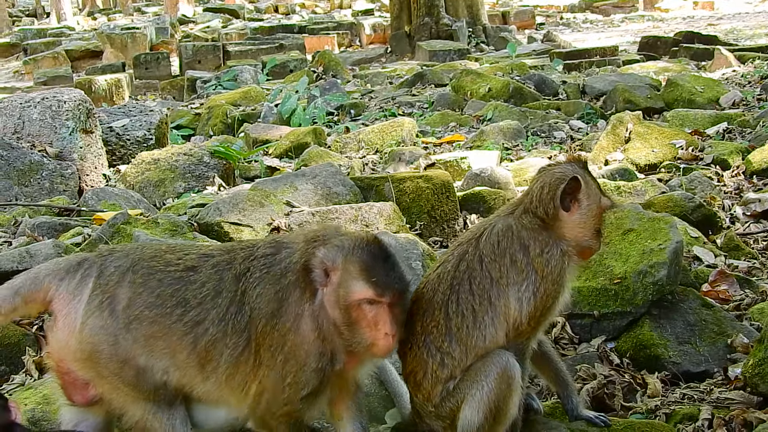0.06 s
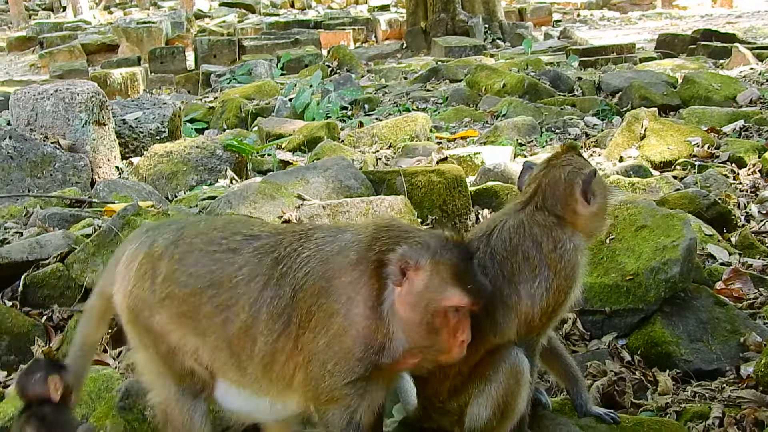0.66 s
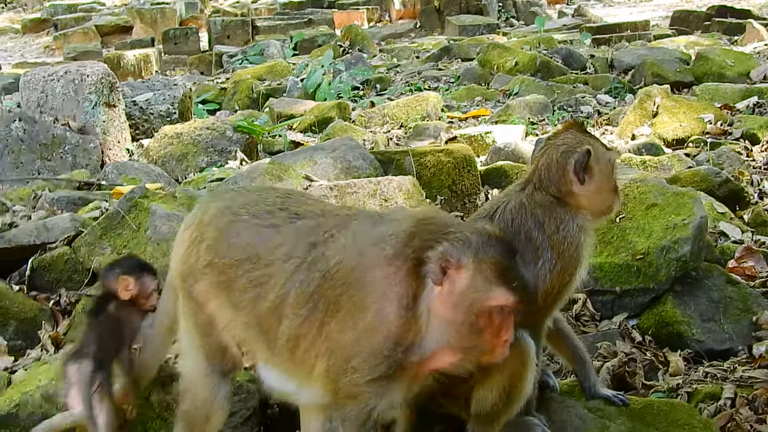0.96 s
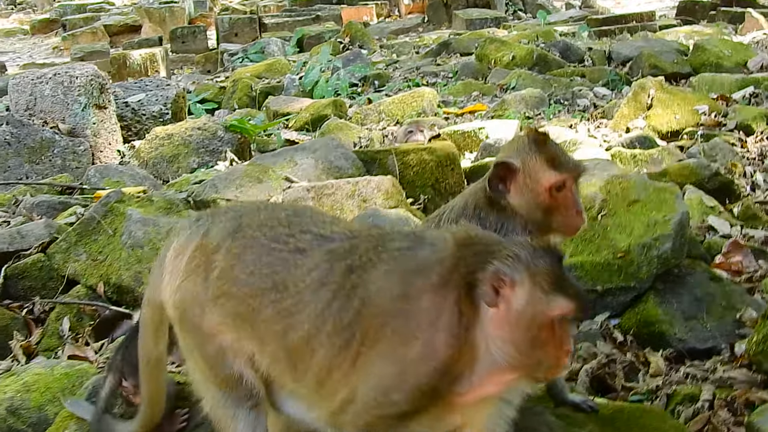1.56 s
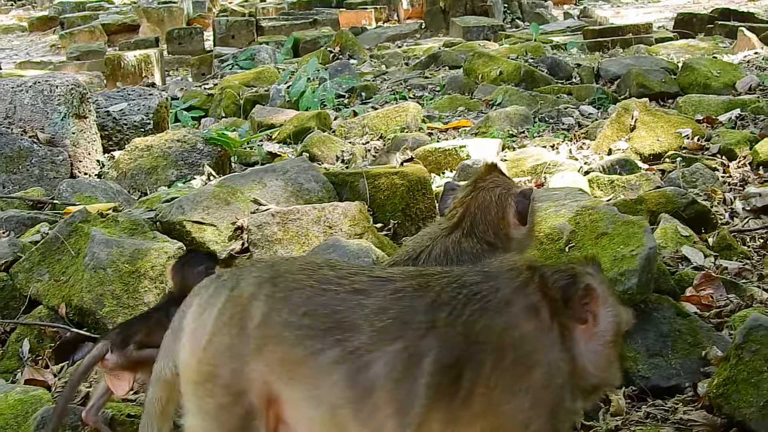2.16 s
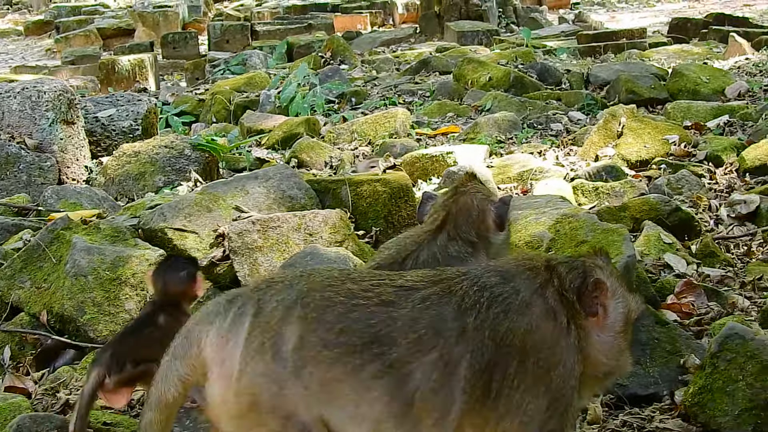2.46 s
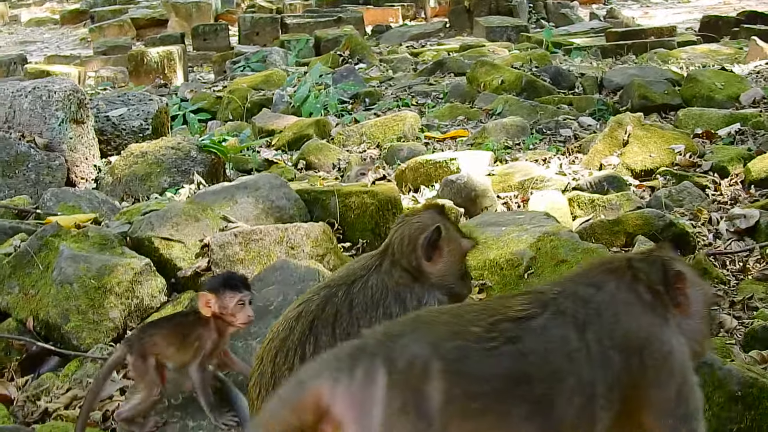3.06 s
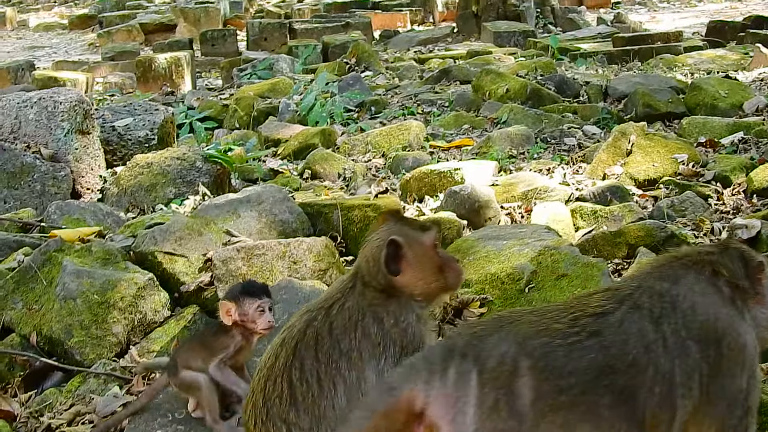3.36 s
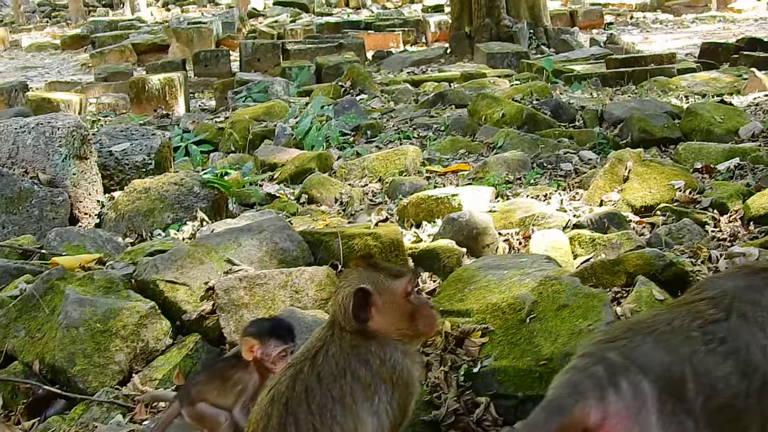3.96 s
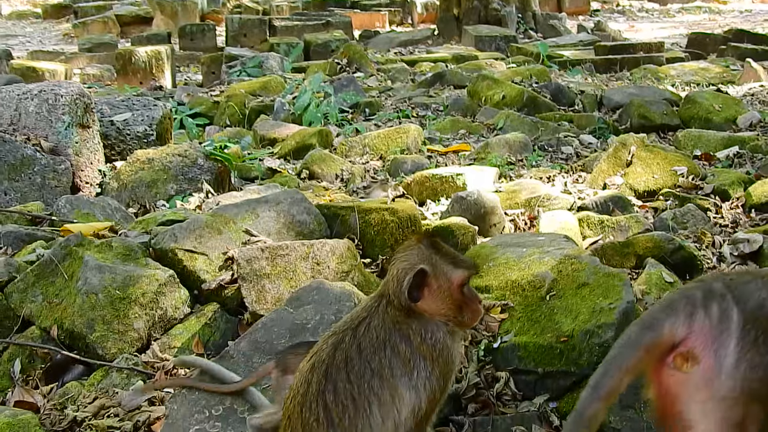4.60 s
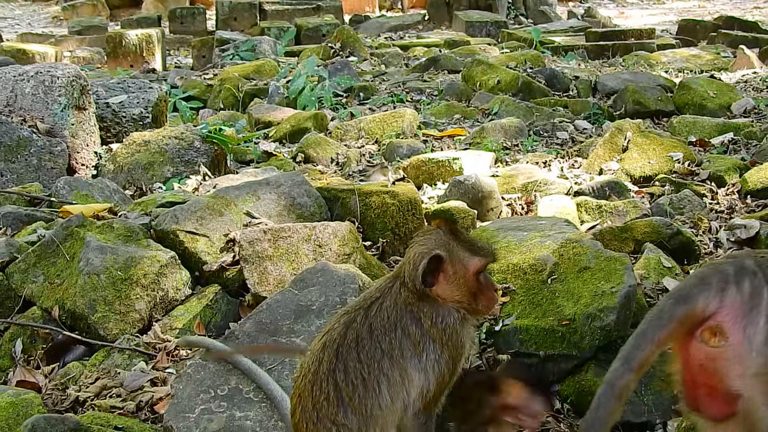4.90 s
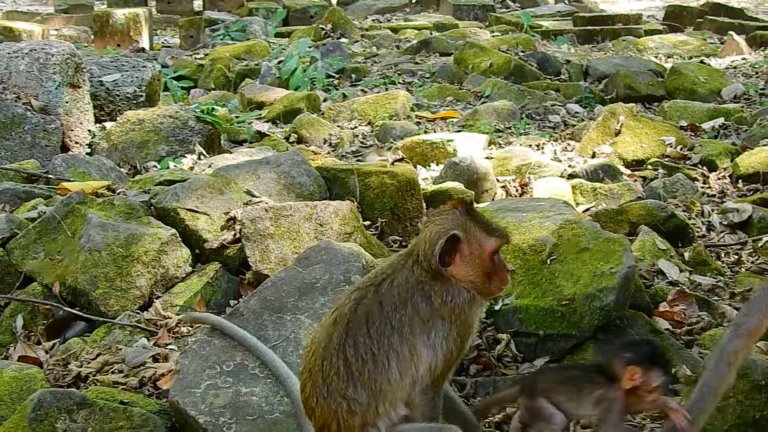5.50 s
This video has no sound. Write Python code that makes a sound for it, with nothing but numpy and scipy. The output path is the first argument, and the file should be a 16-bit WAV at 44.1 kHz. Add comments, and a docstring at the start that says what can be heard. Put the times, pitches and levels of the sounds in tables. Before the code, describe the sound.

A young monkey squeals outdoors among stones, over a faint rumble of air. Each squeal is a very short, thin, high whistle that turns raspy and falls in pitch, several ending on a brief, lower, hoarse note. Six come in quick succession between 0.2 and 1.9 seconds, followed by toneless rasps and one dull, close knock at about 2 seconds. Further squeals come at about 2.4, 2.8 and 3.3 seconds, with a last, weaker one at 4.1. Throughout, dry leaves crunch and rustle as other monkeys walk through them, with a few soft footfalls and stronger crunches near 1.1 and 2.7 seconds. Twigs snap here and there from the start, sounding brighter after 3 seconds and coming thickest from 4.2 to the end at 5.5, sharpest around 5 seconds. The squeals and snaps carry a short, thin echo.

```python
"""A young macaque squeals again and again among mossy stones in a wood while other monkeys cross dry leaves.
Its vocal folds give a thin whistle that turns to a rasp as their cycles grow irregular, then falls in
pitch; a short, low, hoarse note is heard at the end of several squeals. Many tiny fractures make the
leaves crunch and rustle, twigs snap and ring, soles thud softly, and one dull knock sounds close by.
Stones and trunks scatter an echo of the voice and the twigs, and the air rumbles faintly."""
import sys
import numpy as np
from scipy import signal
from scipy.fft import rfft, irfft, next_fast_len
from scipy.io import wavfile

SR = 44100
rng = np.random.default_rng(int(sys.argv[2]) if len(sys.argv) > 2 else 0)


def persist_wave(psi):
    """Save psi, clipped to +-1, as 16-bit WAV."""
    counts = np.round(np.clip(psi, -1, 1) * 32767).astype(np.int16)
    wavfile.write(sys.argv[1], SR, np.atleast_2d(counts).T)


N = 244314
TIME = np.arange(N) / SR

# Spectrum of the air's rumble: frequency_hz, gain_db
AIR_SPECTRUM = [(15, -41), (25, -14), (56, 0), (86, 2), (117, -1), (249, -14), (372, -18.5), (554, -17),
                (600, -12), (780, -58), (1320, -120)]
# Likeness of left and right: frequency_hz, correlation
COHERENCE = [(60, 0.98), (500, 0.91), (1300, 0.94), (2600, 0.82), (5500, 0.65), (10000, 0.46)]
# Steady stirring of the dry leaves: time_s, crunch_db, rustle_db
LEAF_STIRRING = [(0, -49, -41), (.28, -48, -41), (.48, -46, -36), (.72, -43.5, -30.5), (1.05, -44.5, -33),
                 (1.25, -33.5, -29.5), (1.35, -35, -31), (1.52, -32.5, -33.5), (1.64, -38.5, -33.5),
                 (1.78, -33.5, -36), (1.98, -32.5, -31), (2.08, -42, -35), (2.3, -45, -36.5),
                 (2.6, -48, -38), (3.52, -44.5, -36), (3.8, -43, -25), (4.03, -44.5, -32), (4.27, -47, -32),
                 (4.6, -47, -37.5), (5.2, -48.5, -36.5), (5.54, -47.5, -35.5)]
# A foot or flank pushes through the leaves: start_s, length_s, crunch_db, rustle_db
LEAF_PUSHES = [(0.316, .12, -32.5, -28), (0.6, 0.088, -45, -26), (.745, 0.058, -41, -25.5),
               (.895, 0.06, -49, -27), (1.116, .15, -24.5, -21.5), (1.587, 0.034, -41, -27),
               (1.982, 0.043, -36, -25), (2.434, 0.092, -40.5, -28.5), (2.568, 0.027, -48, -33),
               (2.651, 0.04, -34, -26.5), (2.671, 0.059, -26, -19), (2.716, 0.18, -43.5, -33.5),
               (3.058, 0.079, -44.5, -28.5), (3.182, 0.06, -51, -32), (3.566, 0.17, -41, -31),
               (3.681, 0.038, -52, -25), (3.793, 0.11, -36, -31), (4.157, 0.11, -44, -28.5),
               (4.378, 0.18, -51, -36.5), (4.635, 0.069, -43.5, -27), (4.737, 0.04, -41, -29),
               (4.821, 0.037, -42, -30), (4.862, 0.073, -38, -24.5), (4.967, 0.031, -42, -26.5),
               (5.06, 0.033, -33, -21.5), (5.367, .065, -42, -30), (5.478, 0.063, -36, -29)]
# Spectrum of the crunch as heard: frequency_hz, gain_db
CRUNCH_SPECTRUM = [(150, -7.5), (330, -11), (600, -2.5), (1200, 0), (2200, 0), (3200, -2), (4500, -12.5),
                   (7000, -31)]
# Spectrum of the rustle as heard, brightest near 6.5 kHz: frequency_hz, gain_db
RUSTLE_SPECTRUM = [(2000, -26.5), (3200, -9.5), (4400, -4), (5500, -1.5), (6600, 0.5), (7600, -4.5),
                   (9000, -15), (11000, -25), (15500, -43)]
# Soft footfalls and scuffs: start_s, length_s, centre_hz, level_db
FOOTFALLS = [(0.083, 0.073, 210, -40.5), (0.336, 0.039, 430, -45), (0.397, 0.017, 630, -37),
             (0.899, 0.028, 199, -40.5), (1.14, 0.079, 655, -39.5), (2.66, 0.039, 614, -37),
             (2.684, 0.023, 350, -33), (3.58, .15, 230, -50)]
# Twig and leaf stalk snaps: start_s, low_peak_db, low_hz, treble_peak_db, treble_hz, relative_ring_db
TWIG_SNAPS = [(0.122, -21, 1100, -36, 5500, -10), (0.326, -18, 3020, -26, 5500, -5),
              (0.4039, -15.5, 2320, -15, 6500, -9), (1.0937, -15.5, 1900, -32, 5500, -8),
              (1.132, -10, 1370, -20, 5500, -14), (1.157, -15, 1205, -30, 5500, 4),
              (1.183, -17, 1130, -16, 5500, -1), (1.284, -18, 1350, -22, 5530, -5),
              (1.549, -15.5, 2030, -28, 5450, -6), (1.715, -20, 1900, -23, 5500, 1),
              (1.74, -18, 1380, -21, 5500, -3), (2.109, -30, 2500, -19, 6200, -8),
              (2.2107, -23.5, 1880, -34, 5500, -3), (2.277, -26, 1900, -30, 5550, -6),
              (2.573, -28, 1950, -25, 5500, -5), (2.8625, -26, 3000, -15.5, 5530, -11),
              (3.122, -26, 3770, -25, 5500, -12), (3.181, -34, 3380, -5.5, 5330, -3),
              (3.546, -25.5, 3410, -28, 5500, -2), (3.575, -17.5, 1830, -18, 5500, -15),
              (3.6906, -22, 3420, -7.5, 5540, -9), (4.2197, -30, 3370, -15.5, 5010, -9),
              (4.3683, -40, 3380, -16, 6800, -1.5), (4.38, -27, 3400, -15, 4760, -7),
              (4.414, -23, 3310, -10, 6600, -8), (4.457, -30, 3370, -19, 5320, -12),
              (4.654, -23, 3360, -8.5, 6520, -9), (4.659, -23, 3720, -9, 4760, -4),
              (4.6723, -41, 3430, -11.5, 6780, 9), (4.76, -30, 3420, -19, 6230, -6),
              (4.8325, -24.5, 3430, -12.5, 6800, -7), (4.8753, -16, 3670, -9, 6200, -14),
              (4.9265, -16, 3250, -7.5, 6600, -3), (4.961, -14, 3480, 0, 6520, -10),
              (5.0679, -14, 3500, -1, 6080, -12), (5.072, -15, 3500, -11, 6100, -3),
              (5.2816, -20.5, 3360, -13.5, 5080, -4.5), (5.3861, -17.5, 3000, -13, 5330, -13),
              (5.493, -21, 3530, -23, 5200, 2)]
# Squeals that climb to a crest and fall, roughness from 0 to 1: start_s, climb_s, fall_s, first_hz,
# crest_hz, last_hz, first_db, crest_db, first_roughness, crest_roughness, upper_harmonics_db,
# first_left_minus_right_db
SQUEAL_ARCHES = [(.162, 0.089, 0.06, 1857, 2106, 1642, -34.5, -17.5, 0.07, 0.25, 1.5, 1),
                 (.498, .06, .1, 2123, 2194, 1900, -18.5, -15.5, 0.01, 0.4, -0.5, -1.5),
                 (.908, 0.019, 0.032, 1433, 1460, 1400, -31, -28.5, 0.43, 0.47, -9, -1),
                 (1.137, 0.074, 0.04, 2012, 2180, 1860, -22.5, -16, 0.2, 0.26, -8, -.5),
                 (1.39, 0.05, 0.09, 1992, 2220, 1825, -18, -15, 0.25, 0.55, -1.5, -0.5),
                 (1.706, .076, .08, 2012, 2230, 1770, -23, -20, 0.15, .22, 2, -1.5),
                 (2.345, .074, 0.074, 1827, 2080, 1352, -43, -19, .16, .17, 2.5, -1),
                 (2.8065, .004, .048, 1880, 1868, 1760, -15, -19, .12, 0.28, -8, -1),
                 (3.318, 0.037, .092, 2126, 2159, 1835, -25, -17, 0.04, 0.05, -13, -6),
                 (4.097, 0.0088, 0.075, 2173, 2150, 1666, -38, -25, 0.26, .17, -11, -1)]
# The voice falters, then comes back at once and higher: return_s, depth_db, pitch_jump_hz
VOICE_CATCHES = [(0.205, -0.5, 119), (.259, 7, 30), (.547, 19, 70), (1.188, 11, 120), (1.788, 12, 50),
                 (2.421, 7, 40), (3.359, 6, 30)]
# Spectrum of the voice as heard: frequency_hz, gain_db
VOICE_SPECTRUM = [(1400, -32.5), (2100, -21), (3000, -13.5), (4200, -18.5), (5200, -5), (6000, 1.5),
                  (6600, 1.5), (7500, -14), (8600, -19.5), (10300, -18), (12500, -26.5), (15500, -38.5)]
# Short, low, hoarse falling notes at the ends of squeals: start_s, length_s, first_hz, last_hz, level_db
LOW_NOTES = [(0.302, 0.016, 1700, 1350, -36), (0.659, 0.027, 2030, 1730, -35.5),
             (1.491, 0.043, 2110, 1900, -29.5), (2.024, 0.07, 2466, 2450, -33.5),
             (2.478, 0.032, 2113, 1300, -36.5), (3.407, 0.031, 2250, 1790, -36.5),
             (3.443, 0.019, 1570, 1430, -39), (4.174, 0.024, 1574, 1373, -30.5)]
# Toneless rasps between squeals: start_s, length_s, level_db
BREATH_RASPS = [(1.827, 0.11, -25), (1.932, 0.033, -23.5), (1.998, .088, -28), (3.081, 0.016, -35)]
# Spectrum of the rasps as heard: frequency_hz, gain_db
RASP_SPECTRUM = [(1800, -22), (2800, -12), (4600, -2.5), (6500, 2), (7900, -5), (9700, 0), (11200, -14.5),
                 (13000, -23), (15500, -32)]
# Modes of the dull knock: frequency_hz, relative_level_db, t60_s
KNOCK_RESONANCES = [(750, -0.5, 0.013), (1100, -6.5, .014), (1900, -10, 0.0095)]
# Level difference of the two microphone ports: frequency_hz, left_minus_right_db
PORT_BALANCE = [(60, 1.2), (300, 2), (1300, 0.3), (3000, 1), (6000, -0.5), (10000, 1)]
# Phase difference of the ports, negative where the left lags: frequency_hz, left_lead_rad
PORT_LEAD = [(0, 0), (3530, -0.25), (5170, -0.76), (6630, -0.75), (13100, -1.04), (15800, -0.0)]

ATTACK_S, RELEASE_S = 0.0026, 0.0095
TREBLE_LAG_S = 0.013   # the treble of a crack or rustle is heard this long after its low part
HALF_EACH_SIDE = np.array([[.5], [-.5]])   # shares a left-minus-right difference between the channels


def from_db(db):
    """Amplitude ratio: tenfold for every 20 dB."""
    return 10 ** (np.asarray(db) / 20)


def unit_rms(x):
    """Normalisation to unit mean power."""
    return x / np.sqrt(np.mean(x ** 2) + 1e-20)


def at_hz(points, hz):
    """Interpolation of a spectrum on a log-frequency axis."""
    f, value = np.transpose(points)
    return np.interp(np.log(np.maximum(hz, 1)), np.log(f), value)


def wander(rate_hz, size):
    """Random modulation: low-passed noise of unit rms."""
    f = np.fft.rfftfreq(size, 1 / SR)
    return unit_rms(irfft(rfft(rng.standard_normal(size)) / (1 + (f / rate_hz) ** 4), size))


def band(x, low_hz, high_hz):
    """Band-pass filtering with gentle slopes."""
    sos = signal.butter(2, [low_hz, min(high_hz, SR * .45)], "band", fs=SR, output="sos")
    return signal.sosfilt(sos, x + 1e-18)


def ring(x, hz, t60_s):
    """Damped resonator: a unit impulse excites a decaying sine of height 1."""
    r, w = from_db(-60 / (t60_s * SR)), 2 * np.pi * hz / SR
    return signal.lfilter([0, np.sin(w)], [1, -2 * r * np.cos(w), r * r], x + 1e-18)


def spread(pair, spectrum):
    """Partial coherence: two unrelated signals become coloured stereo of rms 1, less alike in the treble."""
    size = pair.shape[1]
    padded = next_fast_len(size)
    f = np.fft.rfftfreq(padded, 1 / SR)
    mid, side = rfft(pair, padded) * from_db(at_hz(spectrum, f))
    alike = at_hz(COHERENCE, f)
    stereo = np.sqrt(1 + alike) * mid + np.sqrt(1 - alike) * side * [[1], [-1]]
    return unit_rms(irfft(stereo, padded)[:, :size])


def gate(t, attack_s):
    """Trapezoidal envelope: a quick start and a quick stop."""
    return np.clip(np.minimum(t / attack_s, (t[-1] - t) / RELEASE_S), 0, 1)


def add(out, start_s, sound):
    """Superposition: a sound joins the mix at its start time."""
    i = max(0, round(start_s * SR))
    out[:, i:i + sound.shape[-1]] += sound[..., :N - i]


def air(level_db=-46):
    """Stationary noise with its power in the bass: the rumble of the air."""
    return from_db(level_db) * spread(rng.standard_normal((2, N)), AIR_SPECTRUM)


def stirring(crest_share=0.27, range_db=10):
    """Incoherent sources add in power: each push swells and dies away over the steady stirring of leaves."""
    times_s, *levels_db = np.transpose(LEAF_STIRRING)
    power = from_db([np.interp(TIME, times_s, db) for db in levels_db]) ** 2
    for start_s, length_s, crunch_db, rustle_db in LEAF_PUSHES:
        t = TIME[:int(length_s * SR)]
        swell_db = np.interp(t / length_s, [0, crest_share, 1], [-range_db, 0, -range_db])
        swell = gate(t, ATTACK_S) * from_db(swell_db)
        add(power[:1], start_s, (from_db(crunch_db) * swell) ** 2)
        add(power[1:], start_s + TREBLE_LAG_S, (from_db(rustle_db) * swell) ** 2)
    return np.sqrt(power)


def crackle(spectrum, per_s, unevenness_db, ring_cycles, rubbing_db, clump_db, pitch_count=28):
    """Shot noise: tiny leaf fractures each ring briefly at one pitch, in clumps over a bed of rubbing."""
    fractures = rng.random(N) < per_s / SR
    strength = from_db(unevenness_db * np.minimum(rng.exponential(1, N), 4))
    clicks = fractures * strength * rng.standard_normal((2, N))
    pitches_hz = np.geomspace(spectrum[0][0], spectrum[-1][0], pitch_count)
    pitch_index = rng.integers(0, pitch_count, N)
    grains = sum(hz * ring(clicks * (pitch_index == k), hz, ring_cycles / hz)
                 for k, hz in enumerate(pitches_hz))
    rubbing = from_db(rubbing_db) * rng.standard_normal((2, N))
    clumps = from_db(clump_db * wander(28, N))
    return spread((unit_rms(grains) + rubbing) * clumps, spectrum)


def leaves():
    """Fracture and friction: weight crunches the litter, and brushing past makes it rustle."""
    weight, brushing = stirring()
    crunch = crackle(CRUNCH_SPECTRUM, per_s=2200, unevenness_db=2.5, ring_cycles=18.3,
                     rubbing_db=4.0, clump_db=1.33)
    rustle = crackle(RUSTLE_SPECTRUM, per_s=3500, unevenness_db=2.0, ring_cycles=42,
                     rubbing_db=5.0, clump_db=1.0)
    return weight * crunch + brushing * rustle


def footfalls(band_ratio=1.23):
    """Soft impact: soles press on earth and stone, each giving a low burst of narrow-band noise."""
    out = np.zeros((2, N))
    for start_s, length_s, hz, level_db in FOOTFALLS:
        size = int(length_s * SR)
        thud = band(rng.standard_normal(SR // 4), hz / band_ratio, hz * band_ratio)[-size:]
        add(out, start_s, from_db(level_db) * unit_rms(thud * signal.windows.tukey(size, .6)))
    return out


def cracks(rows, t60_s, splinter_db, splinter_t60_s, band_ratio, top_hz, edge_db):
    """Impulsive excitation: a sharp tick, a brief ring and a dying spray of splinters."""
    out, t = np.zeros((2, N)), TIME[:SR // 12]
    impulse = signal.unit_impulse(len(t))
    low_pass = signal.butter(4, top_hz, fs=SR, output="sos")
    for start_s, peak_db, hz, ring_db in rows:
        tick = band(impulse, hz / band_ratio, hz * band_ratio)
        tick /= np.abs(tick).max()
        ringing = ring(tick, hz, t60_s)
        ringing /= np.abs(ringing).max()
        noise = rng.standard_normal(len(t)) + .5 * rng.standard_normal((2, len(t)))
        spray = unit_rms(band(noise, hz / band_ratio, hz * band_ratio))
        spray *= from_db(splinter_db - 60 * t / splinter_t60_s)
        crack = signal.sosfilt(low_pass, tick + from_db(ring_db) * ringing + spray)
        crack += from_db(edge_db) * band(impulse, hz, hz * 2)   # the onset is brighter
        add(out, start_s, from_db(peak_db) * crack / np.abs(crack).max())
    return out


def twigs():
    """Transients in two bands: twig snaps, each heard as a low crack with its treble about 13 ms later."""
    low_rows = [(s, db, hz, ring_db) for s, db, hz, _, _, ring_db in TWIG_SNAPS]
    treble_rows = [(s + TREBLE_LAG_S, db, hz, ring_db) for s, _, _, db, hz, ring_db in TWIG_SNAPS]
    low = cracks(low_rows, t60_s=0.025, splinter_db=-11, splinter_t60_s=0.046,
                 band_ratio=1.91, top_hz=4830, edge_db=-30)
    treble = cracks(treble_rows, t60_s=0.013, splinter_db=-15, splinter_t60_s=0.036,
                    band_ratio=1.194, top_hz=8600, edge_db=-16)
    return low + treble


def stone_echo(x, t60_s=0.32, far_db=-16, far_t60_s=1.0, band_hz=(2300, 10000)):
    """Scattering: stones return a short, thin echo to each ear, and far trunks a faint, longer one."""
    t = TIME[:SR * 3 // 4]
    decay = from_db(-60 * t / t60_s) + from_db(far_db - 60 * t / far_t60_s)
    echoes = rng.standard_normal((2, len(t))) * decay * (t > .004)
    echoes /= np.sqrt((echoes ** 2).sum(1, keepdims=True))
    return signal.fftconvolve(band(x, *band_hz), echoes, axes=1)[:, :N]


def vocal_effort(t, climb_s, fall_s, first_hz, crest_hz, last_hz, first_db, crest_db,
                 first_rough, crest_rough, last_rough=0.92, fade_db=14.5):
    """Effort governs phonation: as it builds and collapses, pitch and level arch and roughness grows."""
    up, down = np.clip(t / climb_s, 0, 1), np.clip((t - climb_s) / fall_s, 0, 1)
    slack = np.sin(np.pi / 2 * down) ** 2
    pitch_hz = crest_hz + (first_hz - crest_hz) * (1 - up) ** 2 + (last_hz - crest_hz) * slack
    level_db = first_db + (crest_db - first_db) * up ** 0.86 - fade_db * down ** 2.45
    strain = (crest_rough - first_rough) * up ** 1.6
    breakup = (last_rough - crest_rough) * slack ** 0.96
    return pitch_hz, level_db, first_rough + strain + breakup


def catches(t, falter_s=0.014, return_s=0.0014, settle_s=0.0263):
    """Breaks in phonation: the level dips, then the pitch jumps up and settles back on its arch."""
    loss_db = step_hz = 0
    for time_s, depth_db, jump_hz in VOICE_CATCHES:
        since_s = t - time_s
        loss_db += depth_db * np.exp(-(since_s / np.where(since_s < 0, falter_s, return_s)) ** 2)
        step_hz += jump_hz / 2 * np.tanh(since_s / return_s) * np.exp(-np.abs(since_s) / settle_s)
    return loss_db, step_hz


def vocal_tone(pitch_hz, rough, upper_db, lower_db=-5, waver=0.0075, jitter=0.057, shimmer_db=3):
    """Harmonic series: the folds vibrate near 2 kHz and the third harmonic is heard strongest."""
    size = len(pitch_hz)
    pitch_hz = pitch_hz * (1 + waver * wander(170, size) + jitter * rough * wander(480, size))
    phase = 2 * np.pi * np.cumsum(pitch_hz) / SR
    harmonics = np.arange(1, 8)[:, None]
    shimmer = np.array([wander(70, size) for _ in harmonics])   # each harmonic swells on its own
    balance_db = upper_db * (harmonics > 3) + lower_db * (harmonics < 3)
    heights = from_db(at_hz(VOICE_SPECTRUM, harmonics * pitch_hz) + shimmer_db * shimmer + balance_db)
    return (heights * np.sin(harmonics * phase)).sum(0) / np.sqrt((heights ** 2).sum(0) / 2)


def squeal(start_s, climb_s, fall_s, arch, upper_db, first_pan_db, last_pan_db=-0.1,
           rough_tilt_db=-2, hiss_lift_db=9, flutter_db=2.0, chop_db=2.5):
    """Aperiodic phonation: under strain the folds cycle irregularly and tone gives way to turbulent hiss."""
    t = TIME[:int((climb_s + fall_s) * SR)]
    size = len(t)
    pitch_hz, level_db, rough = vocal_effort(t, climb_s, fall_s, *arch)
    loss_db, step_hz = catches(start_s + t)
    upper_db = upper_db + rough_tilt_db * rough   # the upper harmonics weaken as the voice roughens
    rough = np.clip(rough, .06, 1)
    tone = vocal_tone(pitch_hz + step_hz, rough, upper_db)
    # turbulence is brighter than the folds
    hiss_spectrum = [(hz, db + hiss_lift_db * (7000 < hz < 11500)) for hz, db in VOICE_SPECTRUM]
    hiss = spread(rng.standard_normal((2, size)), hiss_spectrum)
    hiss_share = 0.94 * rough ** 1.82
    voice = np.sqrt(1 - hiss_share) * tone + np.sqrt(hiss_share) * hiss
    # irregular closures chop the voice into bursts a few milliseconds long
    flutter = np.tanh(wander(190, size))
    chop = np.sqrt(rough) * (np.minimum(wander(420, size), 1) - 0.47)
    bursts = from_db(flutter_db * flutter + chop_db * chop)
    pan_db = np.linspace(first_pan_db, last_pan_db, size) * HALF_EACH_SIDE
    return voice * bursts * gate(t, ATTACK_S) * from_db(level_db - loss_db + pan_db)


def low_note(length_s, first_hz, last_hz, octave_db=-15, jitter=0.055):
    """Frequency jitter: a short, falling fundamental and its weak octave waver and so sound hoarse."""
    size = int(length_s * SR)
    pitch_hz = np.linspace(first_hz, last_hz, size) * (1 + jitter * wander(500, size))
    phase = 2 * np.pi * np.cumsum(pitch_hz) / SR
    tone = np.sin(phase) + from_db(octave_db) * np.sin(2 * phase)
    return np.sqrt(2) * signal.windows.tukey(size, .7) * tone


def rasp(length_s, chop_db=2.0, fade_db=5.5):
    """Turbulence: air is forced through the open mouth after the folds have stopped."""
    t = TIME[:int(length_s * SR)]
    level_db = chop_db * np.minimum(wander(300, len(t)), 1) - fade_db * t / length_s
    breath = spread(rng.standard_normal((2, len(t))), RASP_SPECTRUM)
    return breath * gate(t, attack_s=0.0064) * from_db(level_db)


def macaque():
    """Superposition of tone and noise: squeals, the low notes at their ends, and rasps."""
    out = np.zeros((2, N))
    for start_s, climb_s, fall_s, *arch, upper_db, first_pan_db in SQUEAL_ARCHES:
        add(out, start_s, squeal(start_s, climb_s, fall_s, arch, upper_db, first_pan_db))
    for start_s, length_s, first_hz, last_hz, level_db in LOW_NOTES:
        add(out, start_s, from_db(level_db) * low_note(length_s, first_hz, last_hz))
    for start_s, length_s, level_db in BREATH_RASPS:
        add(out, start_s, from_db(level_db) * rasp(length_s))
    return out


def knock(start_s=1.9914, gain_db=-3, band_hz=(520, 4300)):
    """Modal vibration: one blow excites three heavily damped modes and sounds dull."""
    out, blow = np.zeros((2, N)), signal.unit_impulse(SR // 10)
    modes = sum(from_db(gain_db + db) * ring(blow, hz, t60_s) for hz, db, t60_s in KNOCK_RESONANCES)
    add(out, start_s, band(modes, *band_hz))
    return out


def scene(voice_send_db=-5, twig_send_db=-11):
    """Superposition of the direct sounds and the echo of voice and twigs."""
    voice, wood = macaque(), twigs()
    echo = stone_echo(from_db(voice_send_db) * voice + from_db(twig_send_db) * wood)
    return air() + leaves() + footfalls() + wood + echo + voice + knock()


def record(dry, low_cut_hz=38, high_cut_hz=15900):
    """Two-port pickup, the left mostly a little louder and later; then bass cut, clipping and treble cut."""
    size = next_fast_len(N + 1000)
    f = np.fft.rfftfreq(size, 1 / SR)
    port_gain = from_db(at_hz(PORT_BALANCE, f) * HALF_EACH_SIDE)
    port_phase = at_hz(PORT_LEAD, f) * HALF_EACH_SIDE
    heard = irfft(rfft(dry, size) * port_gain * np.exp(1j * port_phase), size)[:, :N]
    high_pass = signal.butter(4, low_cut_hz, "high", fs=SR, output="sos")
    low_pass = signal.ellip(10, .1, 70, high_cut_hz, fs=SR, output="sos")
    clipped = np.clip(signal.sosfilt(high_pass, heard), -1, 1)
    return signal.sosfilt(low_pass, clipped)


dry = scene()
out = record(dry)
persist_wave(out)
```